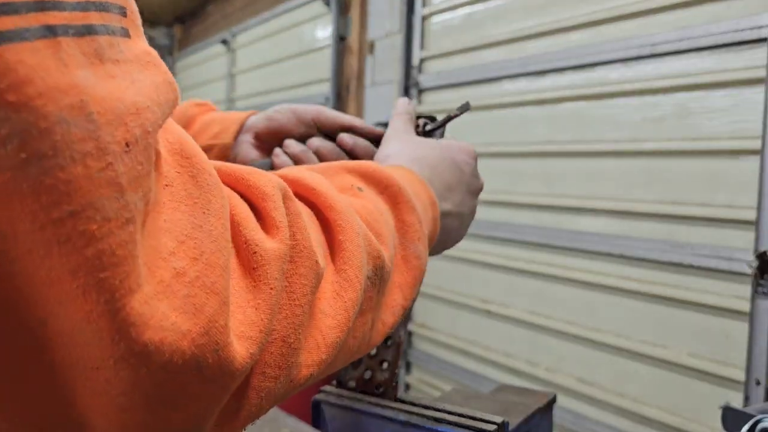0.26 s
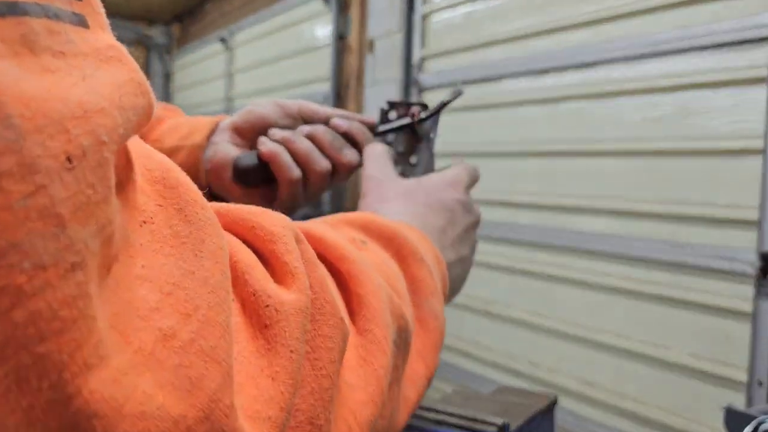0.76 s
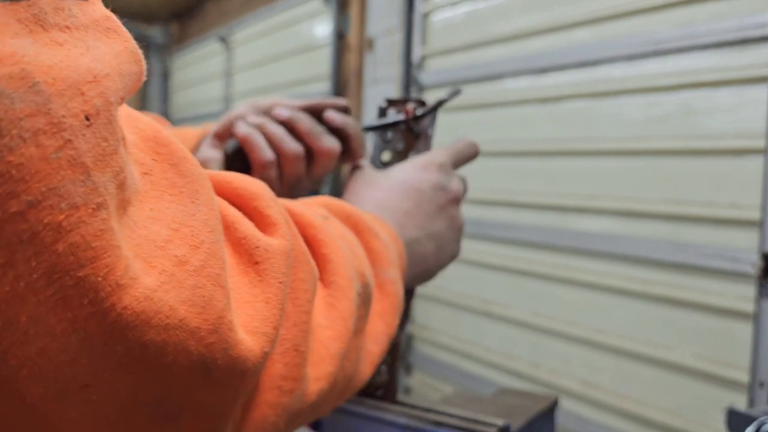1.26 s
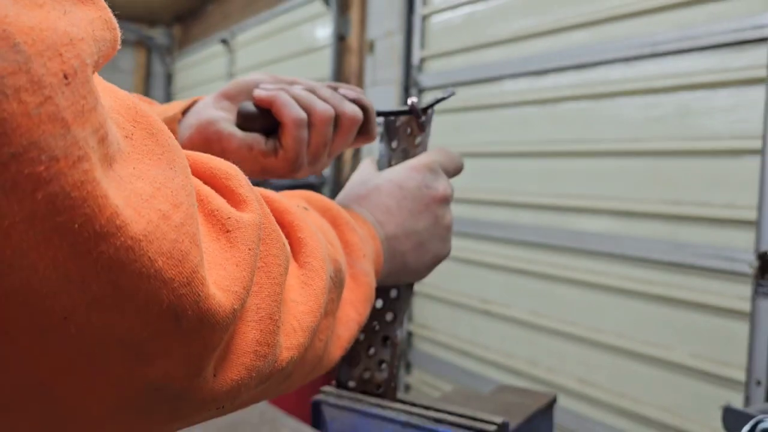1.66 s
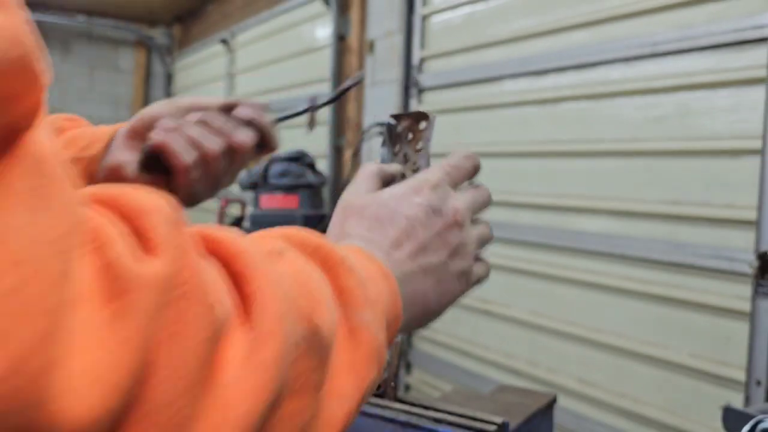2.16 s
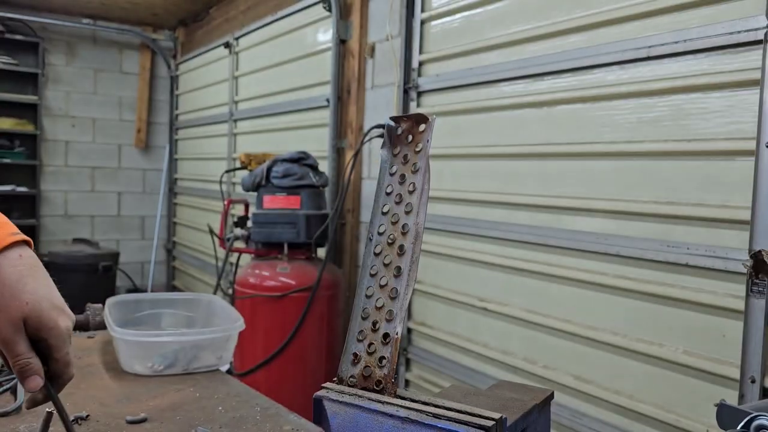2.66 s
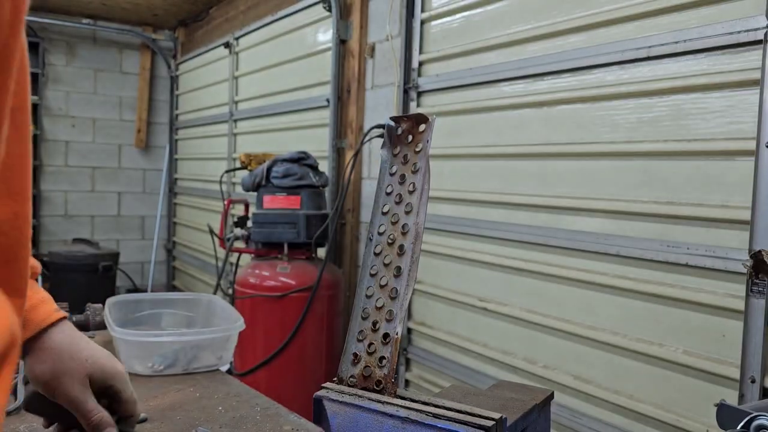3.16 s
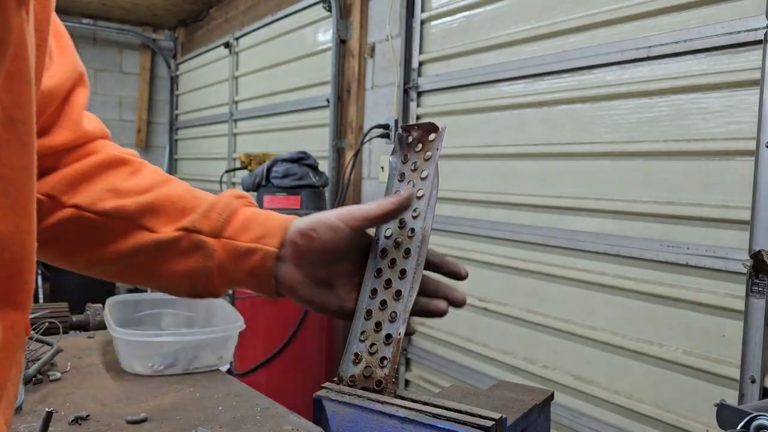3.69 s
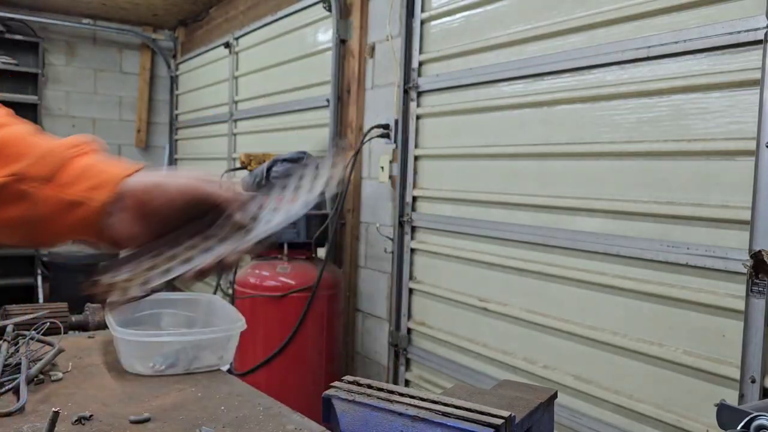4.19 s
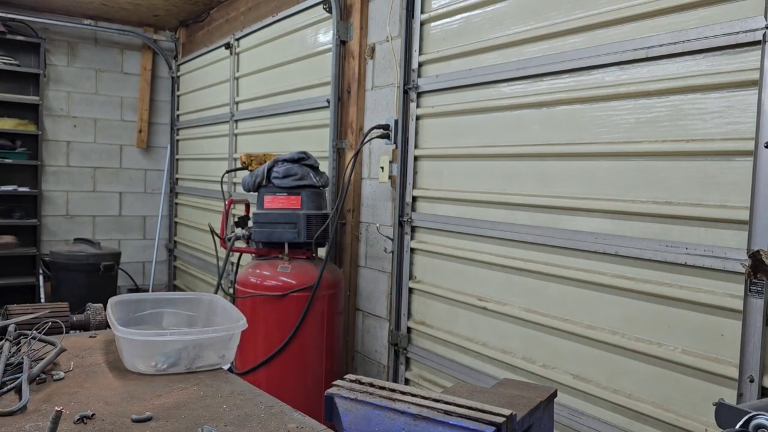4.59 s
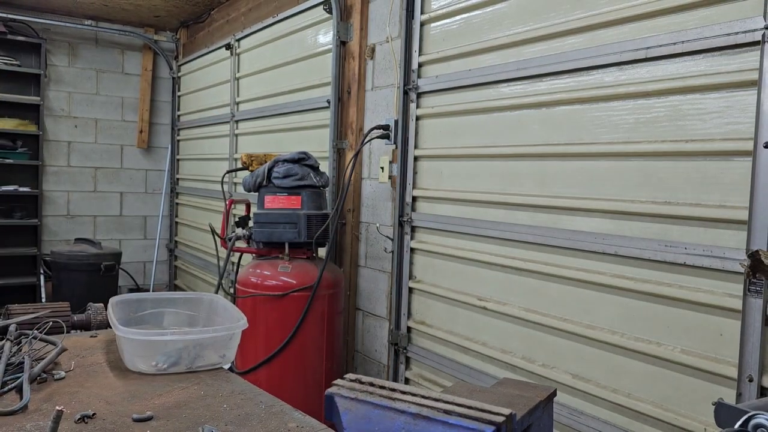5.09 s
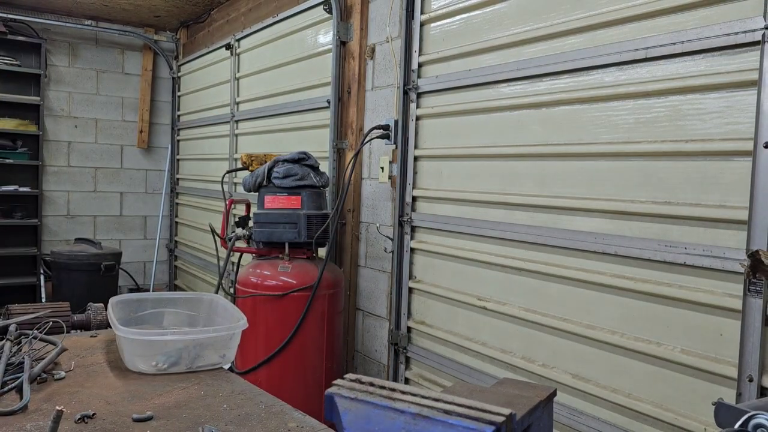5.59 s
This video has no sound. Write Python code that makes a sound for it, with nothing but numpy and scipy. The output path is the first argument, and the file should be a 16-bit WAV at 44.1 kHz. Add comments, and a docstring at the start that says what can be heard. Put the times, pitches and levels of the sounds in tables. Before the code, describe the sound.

A quiet garage with low rumble, soft room noise and a short hard-walled reverberation, heard close in stereo. From 0.1 to 0.7 s a hand tool makes light, dry clicks on a clamped steel strip, with sleeve rustle; at 0.6 s a farther dog gives one short, high yip. Rustling thins, then two thuddy, ringing knocks come near 1.6 s, with faint clicks around 2 s. At 2.5-2.7 s a small fastener skitters in bright ticks, and at 2.77 s the tool is set down with a sharp clank. From 3.1 s hands drag and bump, knocks growing stronger by 3.5 s. At 3.83 s the strip is yanked from the vise: a very loud, abrupt scrape with high squeals, lasting about 0.1 s, with clanks. A low hum around 300 Hz swells past at 4.3 s and fades. Light rustle continues; at 5.2 s the dog barks once, rough and lower, trailing a faint rising whine. Soft bumps and rustle finish.

```python
"""In a garage, hand-tool clicks on a clamped steel strip open the take, close to the microphone: short noise bursts.
Sleeves rustle beside them as swelling hiss; a farther dog yips once, pulses and breath through throat resonances.
Knocks follow, noise cracks with ringing steel modes; a fastener skitters in tuned ticks, and the tool is put down.
The strip is yanked out, scraping noise with squealing tones, and its bending modes hum as it swings past.
The dog barks with a thin gliding whine; room noise and low rumble lie under everything, with a garage tail."""
import sys
import numpy as np
from scipy import signal
from scipy.fft import rfft, irfft
from scipy.io import wavfile

SR = 44100
rng = np.random.default_rng(int(sys.argv[2]) if len(sys.argv) > 2 else 0)


def wav_record(signal):
    """Record a signal, one row per channel, as 16-bit PCM in the file named by sys.argv[1]."""
    frames = np.transpose(np.atleast_2d(signal))
    bounded = np.clip(frames, -1, 1)
    # unit amplitude maps onto the largest positive 16-bit level
    quanta = np.round(bounded * 32767).astype(np.int16)
    wavfile.write(sys.argv[1], SR, quanta)


N = 257984
TIME = np.arange(N) / SR  # seconds

# All event levels below are ahead of the final balance in scene(). Heavier knocks on strip, vise and bench; the
# last two rows, at 5.059 and 5.188 s, are soft footsteps. Each row: start in seconds, level in dB, softness
# 0-1, extra thud in dB, thud centre in Hz, Hz favoured by the struck spot.
KNOCKS = [(1.5662, -32, 0.14, 16, 140, 1430), (1.649, -37.5, 0.2, 15, 140, 1960),
          (2.761, -42.5, 0.3, 1.5, 200, 1500), (2.7736, -28, 0.1, -7.5, 180, 1509),
          (2.855, -45.5, 0, -2.5, 250, 7400), (2.870, -41, 0.17, 1, 250, 1540),
          (3.125, -52.5, 0.35, 17.5, 200, 6000), (3.186, -44, 0.7, 5, 170, 1700),
          (3.261, -43, 0.6, 0, 200, 996.3), (3.319, -35.5, 0.62, 7.5, 190, 700),
          (3.399, -42, 1, 8, 230, 1000), (3.461, -33.5, .05, 8, 250, 4398),
          (3.509, -31.5, 0.2, 14, 258, 4398), (3.529, -22.5, 0.17, 10, 258, 2100),
          (3.8319, -13, 0.04, 2, 220, 1300), (3.867, -24, 0.25, 9, 145, 3030),
          (3.920, -24, 0.13, 2.5, 258, 1287), (5.059, -52, 0.99, 17, 220, 300),
          (5.188, -47, 0.9, 6.5, 260, 300)]
# Basic spectrum of a knock. Each row: frequency in Hz, gain in dB.
KNOCK_COLOUR = [(50, -15.5), (95, -8), (135, 3), (400, -4), (800, -2), (1300, 1.5), (1900, -2.5),
                (3500, -0.5), (6000, 0.5), (8500, -7), (13000, -12.5), (16000, -15)]
# Modes of the clamped strip with its vise. Each row: frequency in Hz, level in dB, t60 in seconds.
STEEL = [(142, -2, .7), (259, -4, .55), (531, -7, .6), (824, -9, .25), (1079, -6, .45), (1290, -4, .25),
         (1325, 9, .04), (1540, -7, .35), (2040, -5, .4), (2120, -3, .4), (2191, -2, .42), (2334, -9, .35),
         (2702, -3, .25), (3030, -5, .4), (3607, -2, .45), (3936, 0, .3), (4083, 0, .4), (4398, -1, .3),
         (5082, -5, .3), (5400, -5, .3), (6234, -3, .3), (6992, -6, .25), (7400, -8, .2)]
# A softer contact is duller, lasts longer and rings the steel less: (hardest, softest).
KNOCK_TILT_DB_PER_OCTAVE = (1, -9.5)
KNOCK_DECAY_S = (0.0039, .015)
KNOCK_RING_DB = (-5, -19)
# Light clicks of the tool on the strip. Each row: start in seconds, level in dB,
# treble tilt in dB per octave, decay time in seconds.
CLICKS = [(0.113, -49, -6.5, 0.012), (.243, -35, 3, 0.0055), (.530, -44.5, -3, 0.0034),
          (0.546, -39, -3.5, 0.011), (0.591, -28, 24, 0.0014), (0.599, -47.5, -1, 0.0043),
          (0.645, -44, 18, .002), (.682, -46, 8, 0.0013), (1.031, -55, 24, 0.0023),
          (1.896, -41.5, 0.5, 0.0054), (1.959, -50, 4.5, 0.02), (2.03, -50, -0.5, 0.0096),
          (3.22, -53, 4.5, 0.012), (3.340, -39, -5.5, 0.0008), (3.598, -48.5, 28, 0.0045),
          (4.677, -44.5, 6.5, 0.018), (5.668, -52, 4, 0.0075)]
# Basic spectrum of a click. Each row: frequency in Hz, gain in dB.
CLICK_COLOUR = [(60, -8.5), (500, -10), (1500, -2), (4000, -1.5), (7000, 2.5), (11000, -2), (14000, 3),
                (16000, -3)]

# The strip slips through the vise jaws in jerks. Each row: start in seconds, length in seconds,
# friction level in dB, squeal tilt in dB per octave.
SLIPS = [(3.812, .018, -40, -20), (3.8312, .016, -6, -3), (3.850, .032, -1.5, 1.5), (3.925, .033, -21, .5)]
SLIP_ATTACK_S, SLIP_RELEASE_DB_PER_S = 0.0013, 519
# Spectrum of the scrape. Each row: frequency in Hz, gain in dB.
SCRAPE = [(100, -23), (250, 4), (700, 2), (1300, -9.5), (1900, -12), (3300, 4), (5500, -5), (7500, 3),
          (9000, -30), (12000, -24.5), (16000, -25.5)]
# Squealing modes of the strip. Each entry: frequency in Hz.
SQUEAL_HZ = [4083, 6234, 6993, 7784, 7900, 12719, 12881]
# The same modes in the same order. Each row: level in dB, left minus right in dB.
SQUEAL = [(-13, -19), (-25, -1.5), (-41.5, -2.5), (-26, 6), (-11, 6), (-12, 7.5), (-25, 11)]

# Bending modes of the freed strip. Each row: frequency in Hz, level in dB.
FREE_MODES = [(317.7, -7.5), (301, -5.5), (435, -20)]
# The freed strip is carried past the microphone, then the hand damps it.
FREED_S, PASS_S, GRIPPED_S = 3.9, 4.33, 4.53
PASS_DISTANCE_M, PASS_M_PER_S, PASS_DB = .15, 3.9, -31.5
NEAR_FIELD_POWER, GRIP_DB_PER_S = 1.31, 37
SOUND_M_PER_S = 343

# A small fastener bouncing. Each row: start in seconds, level in dB, extra bright centre in Hz.
BOUNCES = [(2.515, -41.5, 3780), (2.5453, -43.5, 6150), (2.609, -49, 4200), (2.626, -50.5, 3700),
           (2.6416, -44, 6000), (2.6843, -44.5, 9300)]

# Strokes of sleeve and skin, one per arm movement. Each row: start in seconds, length in seconds, level in dB.
STROKES = [(.05, 0.22, -51), (.32, 0.1, -54.5), (.44, 0.053, -55.5), (.57, 0.31, -51.5), (.71, 0.16, -51.5),
           (1.02, 0.36, -61.5), (1.24, 0.18, -52.5), (1.44, 0.055, -60.5), (1.92, 0.21, -57),
           (3.12, 0.88, -52), (3.52, 0.15, -41.5), (4.18, 0.16, -44.5), (4.27, 0.19, -48.5),
           (4.48, 0.075, -67.5), (4.66, 0.12, -53), (4.74, 0.29, -66), (5.06, 0.13, -47.5),
           (5.46, 0.37, -57.5)]
RESTING_CLOTH_DB = -69.5
# Spectrum of rubbing cloth. Each row: frequency in Hz, gain in dB.
CLOTH = [(100, 4), (300, 2.5), (800, -1), (2000, -4.5), (4000, 4), (7000, 1), (9500, -6.5), (13000, -3.5),
         (16000, 1)]
# Hands lean and drag on bench and strip; the row at 1.56 s is the low thud under the first knock. Each row:
# start in seconds, length in seconds, level in dB.
DRAGS = [(1.0, .35, -63), (1.27, 0.13, -63), (1.56, 0.1, -48.5), (3.12, 0.3, -53.5), (3.31, 0.13, -41),
         (3.46, .22, -43), (3.6, 0.41, -52), (4.15, 0.35, -43)]
# Spectrum of the bench under the hands. Each row: frequency in Hz, gain in dB.
BENCH = [(60, -24), (105, -14.5), (140, -6), (200, -3.5), (260, -5), (400, -5), (700, -10), (1500, -19),
         (4000, -45.5)]

# Dog calls. Each row: start in seconds, rise in seconds, fade in dB per second, effort in dB,
# pitch in Hz, roughness 0-1, clear fundamental in dB.
YIP = (.595, .06, 155, -37.5, 1080, .06, -9)
BARK = (5.203, .064, 180, -30.5, 464, .46, -9)
# Resonances of the dog's throat. Each row: frequency in Hz, width in Hz, level in dB.
THROAT = [(468, 45, -2), (610, 65, 0), (780, 90, -9), (1110, 110, -5), (1350, 140, -11), (1680, 170, -15),
          (2200, 170, -13)]
# A call starts sharp, drops onto its pitch, then rides one small arch; SCOOP and ARCH are shares of the pitch.
CALL_S, SCOOP, SCOOP_S, ARCH = .26, 0.28, 0.011, .025
# A thin whine trailing the bark. The row: start in seconds, length in seconds, level in dB.
WHINE = (5.30, .11, -60)
WHINE_HZ, WHINE_GLIDE_HZ_PER_S = 3156, 690

# Room noise spectrum. Each row: frequency in Hz, relative level in dB per Hz.
AIR = [(12, -30), (20, -0.5), (65, 1), (100, -12.5), (177, -22), (270, -19), (377, -29), (513, -21.5),
       (923, -33), (3340, -36.5), (4940, -39.5), (7310, -34), (8180, -42), (8890, -60.5), (11800, -39),
       (16000, -48.5)]
# Likeness of the room noise at the two sides. Each row: frequency in Hz, left-right correlation.
AIR_LIKENESS = [(30, 0.99), (150, 0.98), (400, 0.73), (1000, 0.13), (16000, .1)]
# Low rumble swells when the worker shifts weight. Each row: start in seconds, length in seconds, level in dB.
SHIFTS = [(1.12, 0.32, -51), (1.53, 0.15, -48), (2.66, .14, -51), (3.78, .24, -54), (5.1, .25, -56.5)]
RUMBLE_DB = -59.5
# Decay of the garage reflections. Each row: frequency in Hz, t60 in seconds.
GARAGE = [(100, 0.6), (300, 0.85), (1000, 0.89), (2500, 0.79), (4000, 0.53), (6000, 0.44), (9000, 0.32),
          (14000, 0.093)]
# Response of the microphone. Each row: frequency in Hz, gain in dB.
MIC = [(20, -1), (7800, -4.5), (9000, -5), (10400, -8.5), (11600, -1.5), (13000, -1.5), (16000, -8)]
EDGE_HZ = 16300  # upper band limit


def amp(db):
    """Decibels to gain."""
    return 10 ** (np.asarray(db) / 20)


def unit(x):
    """Scales to rms 1."""
    return x / np.sqrt(np.mean(x ** 2) + 1e-20)


def read(points, hz):
    """A spectrum table joined on a log-frequency axis."""
    f, value = np.transpose(points)
    return np.interp(np.log(hz + 1), np.log(f + 1), value)


def bump(hz, centre_hz, octaves):
    """A bell of height 1 on the log-frequency axis."""
    return np.exp(-.5 * (np.log2((hz + 1) / centre_hz) / octaves) ** 2)


def place(db):
    """Left and right gains for a level difference, left minus right."""
    gains = amp([[db / 2], [-db / 2]])
    return unit(gains)


def add(mix, s, sound):
    """Mixes a stereo sound in at time s."""
    part = mix[:, round(s * SR):][:, :sound.shape[1]]
    part += sound[:, :part.shape[1]]


def colour(x, db_at, size=2048):
    """Causal minimum-phase filter with the gain db_at(Hz), so attacks stay sharp."""
    log_gain = np.log(amp(db_at(abs(np.fft.fftfreq(size, 1 / SR)))))
    spectrum = np.exp(np.conj(signal.hilbert(log_gain)))
    taps = np.fft.ifft(spectrum).real[:size // 2]
    return signal.oaconvolve(x, taps[None], axes=1)[:, :x.shape[1]]


def drift(rate_hz):
    """Slow random wavering of rms 1, made at 300 points a second."""
    f = np.fft.rfftfreq(2048, 1 / 300)
    slow = irfft(rfft(rng.standard_normal(2048)) / (1 + (f / rate_hz) ** 4))
    return unit(np.interp(TIME * 300, np.arange(len(slow)), slow))


def pair(z, merge_hz=700):
    """Two noises as two close microphones hear them: alike in the bass, apart in the treble."""
    b, a = signal.butter(1, merge_hz, "high", fs=SR)
    side = signal.lfilter(b, a, z[1])
    return np.array([z[0] + side, z[0] - side])


def burst(decay, db_at, chatter=.12, size=8192):
    """A contact: a dying spray of micro-impacts and weaker chatter, rms 1 if packed into 20 ms."""
    t = np.arange(size) / SR
    shape = np.exp(-t / decay) + chatter * np.exp(-t / (4 * decay))
    x = colour(pair(rng.standard_normal((2, size)) * shape), db_at)
    return unit(x) * np.sqrt(SR / 50 / size)


def swells(rows, attack=.3, hold=.4):
    """Gain of movements that each rise, hold and die away, in shares of their length; powers add."""
    corners = np.sort(np.clip([0, attack, attack + hold, 1], 0, 1))
    power = 0
    for start, length, db in rows:
        shape = np.interp(TIME, start + length * corners, [0, 1, 1, 0])
        power = power + (amp(db) * shape) ** 2
    return np.sqrt(power)


def knocks():
    """Heavier blows: a crack with a low thud; the spot that is struck favours some modes of the steel."""
    out, t = np.zeros((2, N)), np.arange(SR) / SR
    hz, mode_db, t60 = np.transpose(STEEL)
    decays = amp(mode_db[:, None] - 60 * t / t60[:, None])
    rings = decays * np.exp(2j * np.pi * hz[:, None] * t)
    onset = 1 - np.exp(-t / 0.0014)
    for s, db, softness, thud_db, thud_hz, favoured_hz in KNOCKS:
        tilt = np.interp(softness, [0, 1], KNOCK_TILT_DB_PER_OCTAVE)
        decay = np.interp(softness, [0, 1], KNOCK_DECAY_S)
        ring_db = np.interp(softness, [0, 1], KNOCK_RING_DB)

        def weight(f):
            thud = thud_db * bump(f, thud_hz, 0.4)
            return tilt * np.log2((f + 300) / 2500) + thud + 5 * bump(f, favoured_hz, 0.16)

        crack = burst(decay, lambda f: read(KNOCK_COLOUR, f) + weight(f), chatter=0.086)
        add(out, s, amp(db) * crack)
        # high modes reach the two microphones out of step
        spread = rng.standard_normal((2, len(hz))) * np.minimum(hz / 2000, 2)
        phase = rng.uniform(0, 2 * np.pi, len(hz)) + spread
        drive_db = weight(hz) + 7 * bump(hz, favoured_hz, .1)
        share = amp(drive_db - .5 * max(drive_db))
        ringing = ((share * np.exp(1j * phase)) @ rings).imag
        add(out, s, amp(db + ring_db - 6.0) * ringing * onset)
    return out * place(0.91)


def clicks():
    """Small hard contacts of the tool, close to the microphone, as short coloured noise."""
    out = np.zeros((2, N))
    for s, db, tilt, decay in CLICKS:
        def tone(f):
            return read(CLICK_COLOUR, f) + tilt * np.log2((f + 900) / 4000)
        add(out, s, amp(db) * burst(decay, tone, chatter=0.063))
    return out * place(0.38)


def jerk(start, length):
    """One slip: a sudden rise, a hold, and a steady fall in dB."""
    rise = np.clip((TIME - start) / SLIP_ATTACK_S, 0, 1)
    return rise * amp(-SLIP_RELEASE_DB_PER_S * np.clip(TIME - start - length, 0, .5))


def yank():
    """Stick and slip in the jaws: a gritty scrape through the steel's modes, a few of which squeal."""
    jerks = np.array([amp(db) * jerk(start, length) for start, length, db, _ in SLIPS])
    tilt_db = np.transpose(SLIPS)[-1]
    grit = pair(rng.standard_normal((2, N))) * amp(0.96 * drift(120))
    ringing = 0
    for hz, db, _ in STEEL:
        b, a = signal.iirpeak(hz, hz / 14, SR)  # 14 Hz wide
        ringing = ringing + amp(db) * signal.lfilter(b, a, grit)
    scrape = amp(-16.0) * unit(colour(grit + 4 * ringing, lambda f: read(SCRAPE, f)))
    squeal = 0
    for hz, (db, side_db) in zip(SQUEAL_HZ, SQUEAL):
        turns = np.cumsum(hz + 12 * drift(60)) / SR
        lag = np.array([[0], [np.interp(hz, [4000, 8000], [1.9, 1.1])]])  # radians between the microphones
        drive = (amp(tilt_db * np.log2(hz / 8000))[:, None] * jerks).max(0)
        tone = np.sqrt(2) * np.sin(2 * np.pi * turns + lag)
        squeal = squeal + drive * place(side_db) * amp(db + 2.2 * drift(50)) * tone
    return jerks.max(0) * scrape, squeal


def swing():
    """The freed strip hums on its bending modes, loudest as it passes; its turning makes the hum waver."""
    along = PASS_M_PER_S * (TIME - PASS_S)  # metres past the closest point
    distance = np.hypot(along, PASS_DISTANCE_M)
    doppler = 1 - PASS_M_PER_S * along / distance / SOUND_M_PER_S
    rise = np.clip((TIME - FREED_S) / .1, 0, 1)
    ringing = rise * amp(-GRIP_DB_PER_S * np.maximum(TIME - GRIPPED_S, 0))
    hum = 0
    for hz, db in FREE_MODES:
        level = amp(db + .5 * drift(28))
        turns = np.cumsum(hz * doppler + 3 * drift(30)) / SR
        hum = hum + level * np.sin(2 * np.pi * turns)
    nearness = (PASS_DISTANCE_M / distance) ** NEAR_FIELD_POWER
    return place(3.3) * amp(PASS_DB) * nearness * ringing * unit(hum)


def fastener():
    """Sharp ticks; each bounce lands on another edge and has its own colour."""
    out = np.zeros((2, N))
    for s, db, hz in BOUNCES:
        def ring(f):
            return 26 * bump(f, 3740, 1.0) + 6 * bump(f, 3870, 0.16) + 11 * bump(f, hz, 0.12)
        add(out, s, amp(db) * burst(.0008, ring, chatter=.1))
    return out


def sleeves():
    """Cloth and skin rubbing: a hiss of fibres with tiny catches."""
    strength = amp(1.7 * np.minimum(rng.exponential(1, N), 3))
    catches = (rng.random(N) < 500 / SR) * strength  # about 500 a second
    flutter = amp(1.8 * drift(35))
    fibres = pair(rng.standard_normal((2, N))) * (1 + 2.6 * catches) * flutter
    rubbing = np.hypot(swells(STROKES, attack=0.24, hold=0.41), amp(RESTING_CLOTH_DB))
    return place(1.5) * rubbing * unit(colour(fibres, lambda f: read(CLOTH, f)))


def handling():
    """Dull, lumpy rumble of the wooden bench under the hands: noise of wavering level."""
    bumps = pair(rng.standard_normal((2, N)), merge_hz=900) * amp(6.7 * drift(23))
    leaning = swells(DRAGS, attack=0.23, hold=0.58)
    return place(1.5) * leaning * unit(colour(bumps, lambda f: read(BENCH, f)))


def dog(call, jitter, top_hz, brightness_db):
    """Uneven pulses of the vocal folds and puffs of air pass the throat; the fundamental stays clear."""
    start, rise, fade_db_per_s, effort_db, pitch_hz, rough, clear_db = call
    on = (TIME > start) & (TIME < start + CALL_S)
    t, rough = TIME[on] - start, np.clip(rough, 0, .55)
    scoop = SCOOP * np.exp(-t / SCOOP_S)
    arch = ARCH * np.sin(np.pi * t / CALL_S) ** 2
    hz = pitch_hz * (1 + scoop + arch)
    fade_db = fade_db_per_s * np.maximum(t - rise, 0)
    effort = np.minimum(t / rise, 1) ** 2 * amp(effort_db - fade_db)
    turns = np.cumsum(hz * (1 + jitter * drift(230)[on])) / SR
    # six harmonics; brightness_db is their slope per octave
    folds = sum(np.cos(2 * np.pi * k * turns) * amp(brightness_db * np.log2(k)) for k in range(1, 7))
    puffs = (0.26 + np.exp(-(turns % 1) / 0.43)) * rng.standard_normal(N)[on]
    drive = (1 - rough) * unit(folds) + 5 * rough * unit(puffs)
    voice = 0
    for f, width, db in THROAT:
        b, a = signal.iirpeak(f, f / width, SR)
        voice = voice + amp(db) * signal.lfilter(b, a, drive)
    band = signal.butter(8, [.9 * pitch_hz, top_hz], "band", fs=SR, output="sos")
    voice = unit(signal.sosfilt(band, voice))
    fundamental = amp(clear_db) * np.sin(2 * np.pi * np.cumsum(hz) / SR)
    out = np.zeros(N)
    out[on] = effort * (voice + fundamental)
    return out * np.ones((2, 1))


def whine():
    """A faint, unsteady whistle that glides upward."""
    glide = WHINE_GLIDE_HZ_PER_S * (TIME - WHINE[0])
    turns = np.cumsum(WHINE_HZ + glide + 35 * drift(90)) / SR
    tone = np.sqrt(2) * np.sin(2 * np.pi * turns)
    return place(0) * swells([WHINE], attack=0.51, hold=.15) * tone


def air():
    """Quiet room noise over a restless low rumble, split at about 120 Hz."""
    f = np.fft.rfftfreq(N, 1 / SR)
    a, b = rfft(rng.standard_normal((2, N)))
    same = np.clip(read(AIR_LIKENESS, f), -1, 1)
    z = np.array([a, same * a + np.sqrt(1 - same ** 2) * b]) * amp(read(AIR, f))
    low = 1 / (1 + (f / 120) ** 4)
    rumble = np.hypot(amp(RUMBLE_DB + 1.2 * drift(5)), swells(SHIFTS, attack=0.22, hold=.4))
    return amp(-63.5) * unit(irfft(z * (1 - low), N)) + rumble * unit(irfft(z * low, N))


def garage(x):
    """Dense reflections from bench, door and block walls; the far treble dies first."""
    sparse = rng.standard_normal((2, SR)) * (rng.random((2, SR)) < .15)
    taps = pair(sparse, merge_hz=800)
    hz, t, z = signal.stft(taps, SR, nperseg=256)
    fading = amp(-60 * t / read(GARAGE, hz)[:, None])
    tail = signal.istft(z * fading, SR, nperseg=256)[1]
    age = np.arange(tail.shape[1]) / SR
    # reflections begin 3 ms after the sound, the early ones stronger
    tail *= np.clip((age - .003) / 0.0014, 0, 1) * (1 + 1.8 * np.exp(-age / 0.014))
    return signal.fftconvolve(x, tail / np.linalg.norm(tail[0]), axes=1)[:, :N]


def scene():
    """Near things are heard mostly direct; the farther dog is sent about equally to the reflections."""
    scrape, squeal = yank()
    yip = dog(YIP, jitter=.03, top_hz=2550, brightness_db=-.5)
    bark = dog(BARK, jitter=.045, top_hz=2450, brightness_db=-3)
    # Each row: sound, direct gain in dB, room gain in dB.
    sources = [
        (knocks(), -1, -2),
        (clicks(), 0, -5),
        (scrape, -1, -3),
        (squeal, 0, -13),
        (swing(), 0, -15),
        (fastener(), 0, -3),
        (sleeves(), 0, -9),
        (handling(), -1, -8),
        (yip, -7, -6),
        (bark, -5, -5),
        (whine(), -5, -4),
    ]
    direct = sum(amp(db) * x for x, db, _ in sources)
    to_room = sum(amp(db) * x for x, _, db in sources)
    return direct + garage(to_room) + air()


def record(dry):
    """The microphone's dip in the treble, overload near full scale, and the band limit."""
    heard = np.clip(colour(dry, lambda f: read(MIC, f)), -.85, .85)
    band_limit = signal.firwin(511, EDGE_HZ, window=("kaiser", 9), fs=SR)
    return signal.oaconvolve(heard, band_limit[None], "same")


dry = scene()
out = record(dry)
wav_record(out)
```